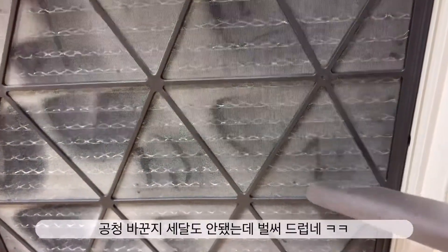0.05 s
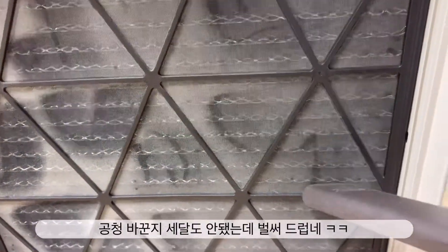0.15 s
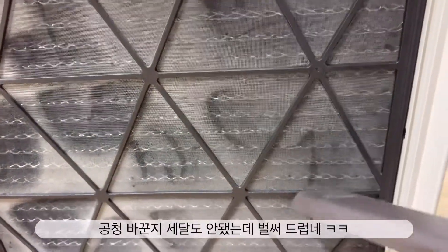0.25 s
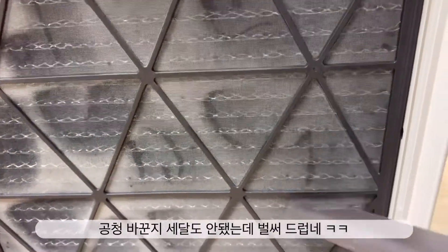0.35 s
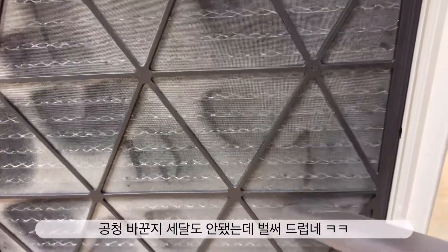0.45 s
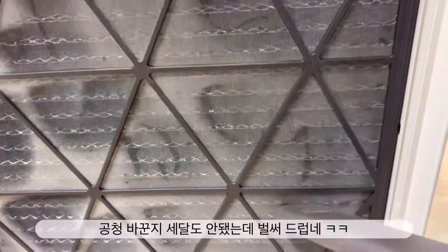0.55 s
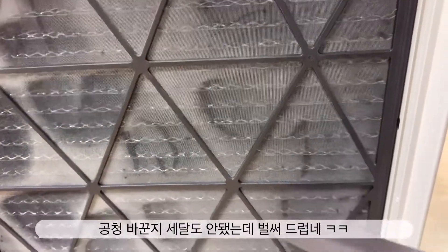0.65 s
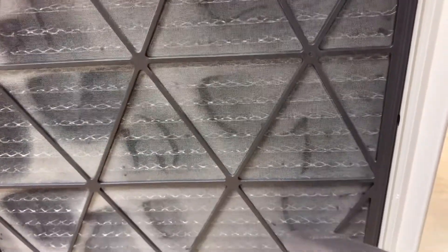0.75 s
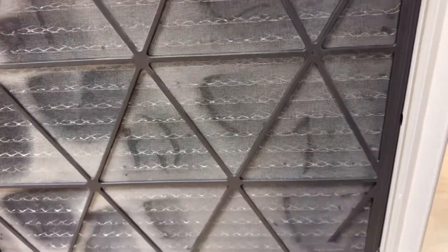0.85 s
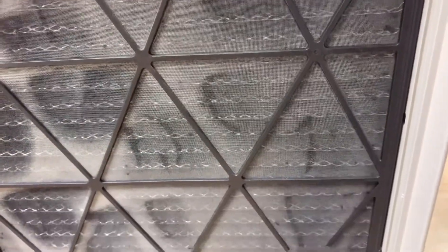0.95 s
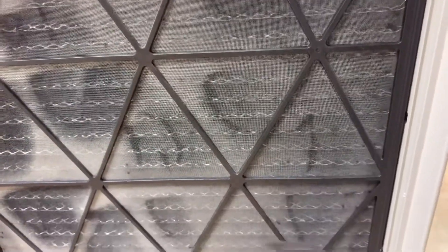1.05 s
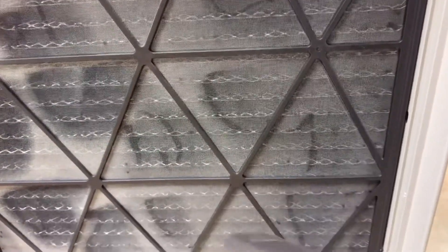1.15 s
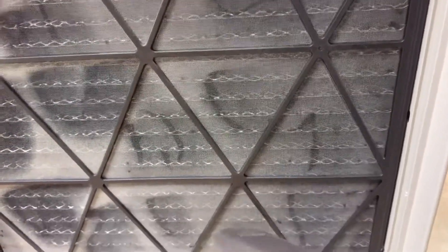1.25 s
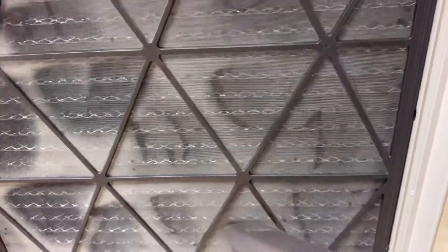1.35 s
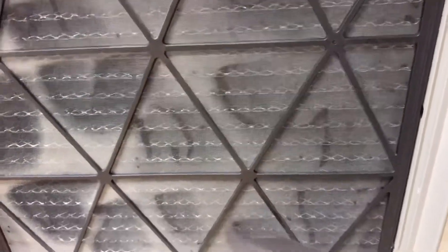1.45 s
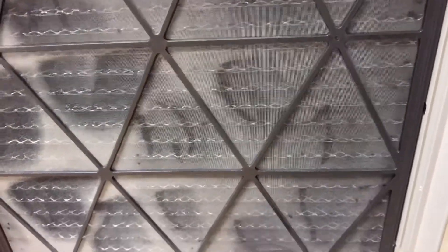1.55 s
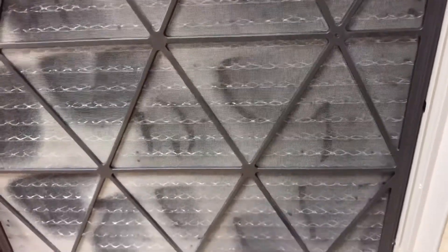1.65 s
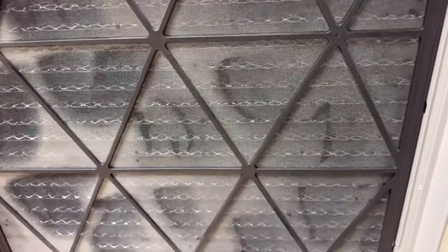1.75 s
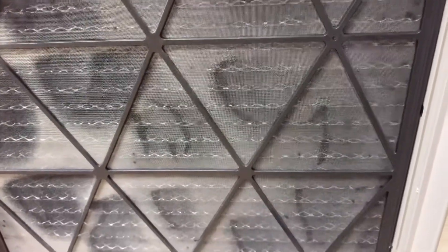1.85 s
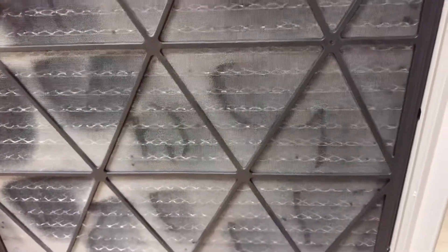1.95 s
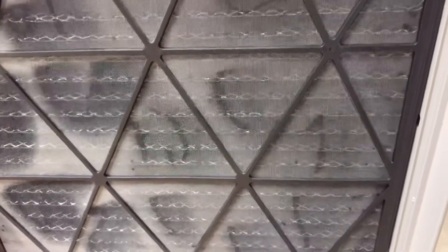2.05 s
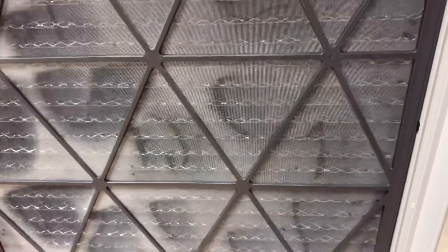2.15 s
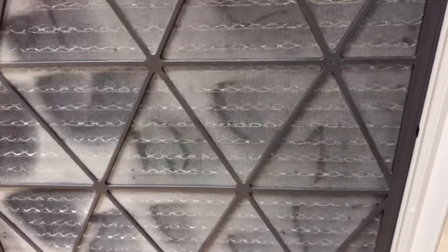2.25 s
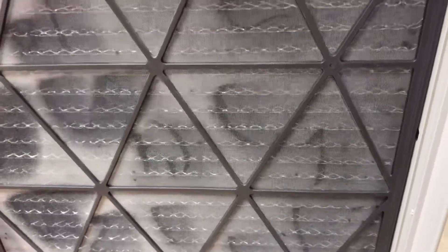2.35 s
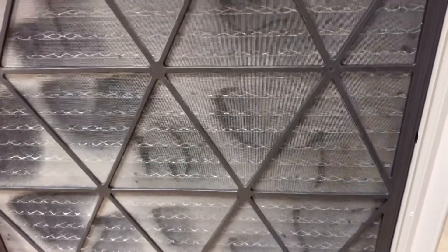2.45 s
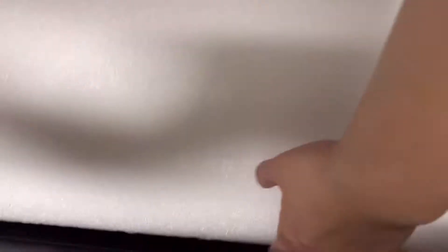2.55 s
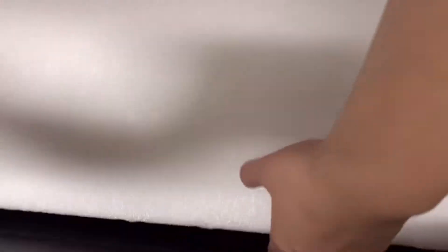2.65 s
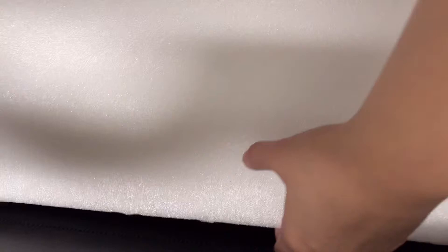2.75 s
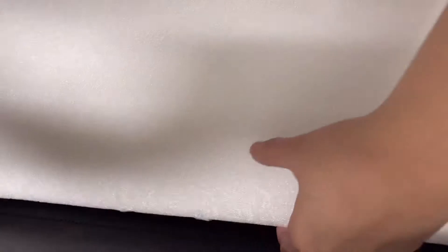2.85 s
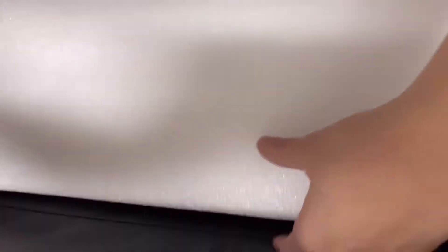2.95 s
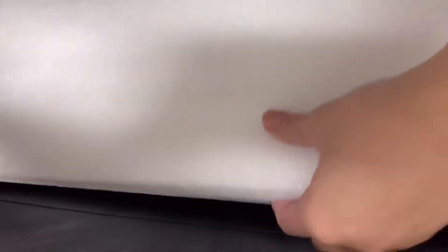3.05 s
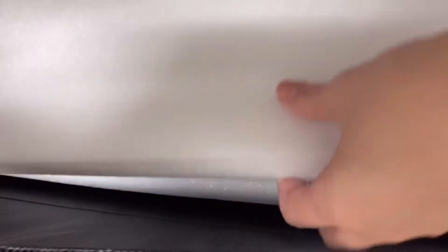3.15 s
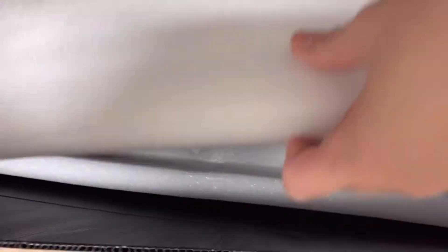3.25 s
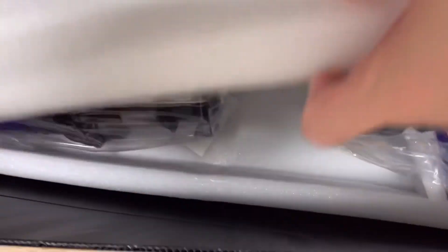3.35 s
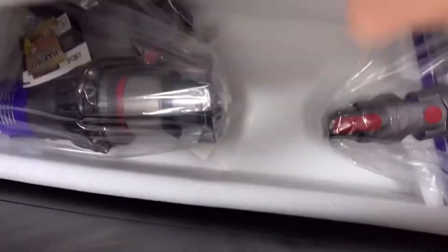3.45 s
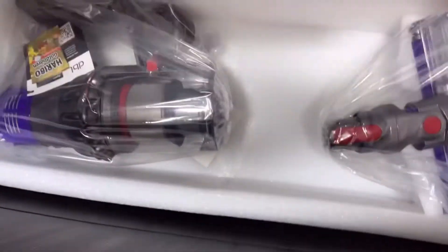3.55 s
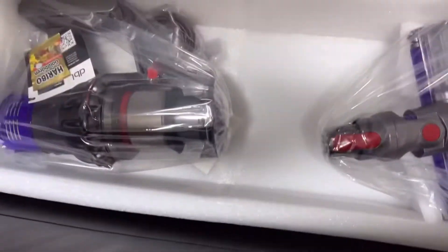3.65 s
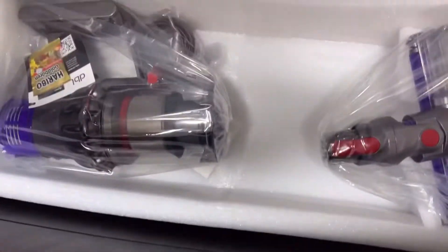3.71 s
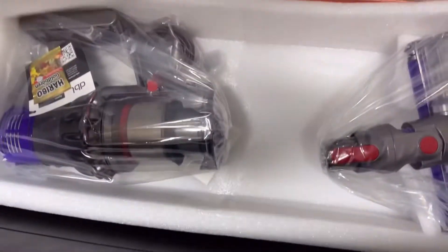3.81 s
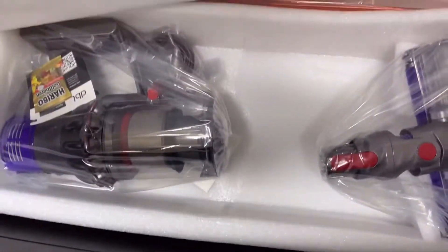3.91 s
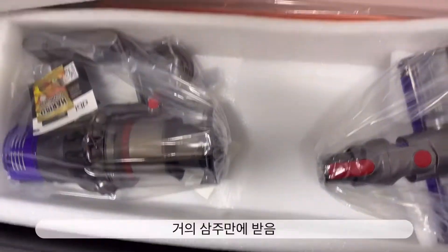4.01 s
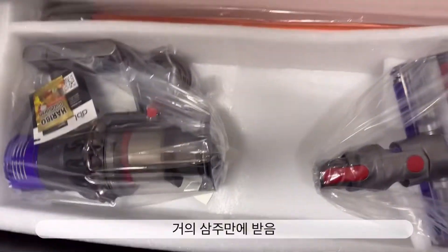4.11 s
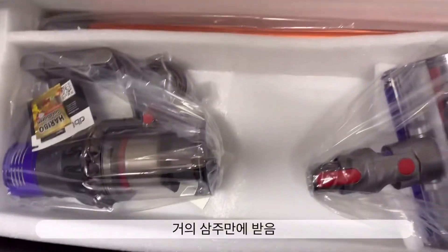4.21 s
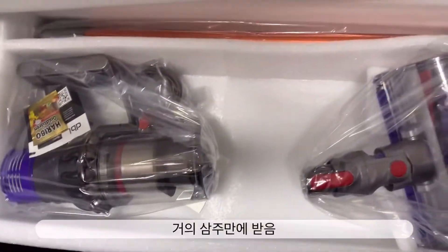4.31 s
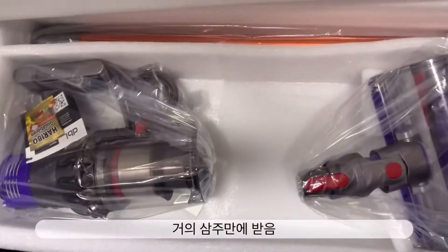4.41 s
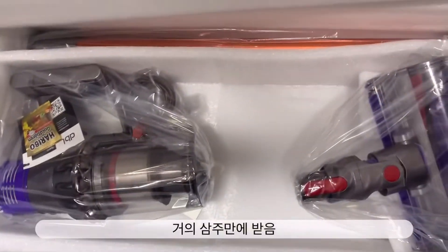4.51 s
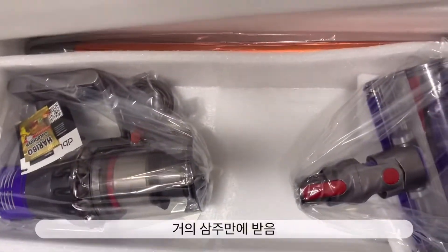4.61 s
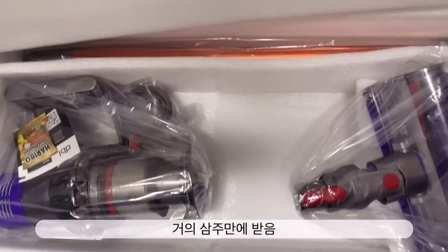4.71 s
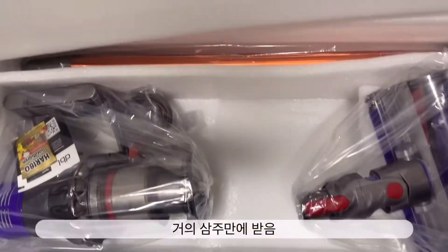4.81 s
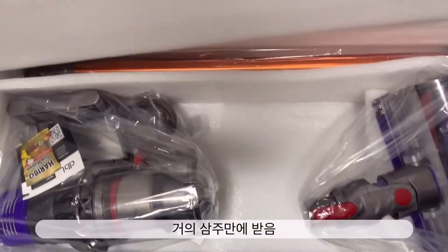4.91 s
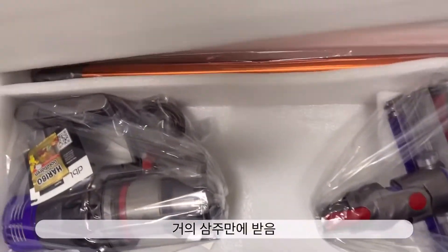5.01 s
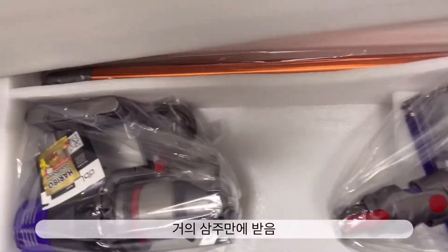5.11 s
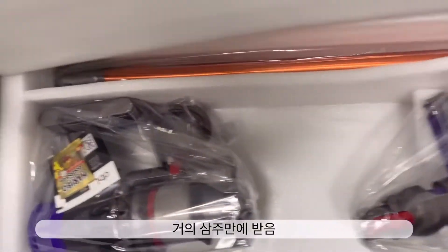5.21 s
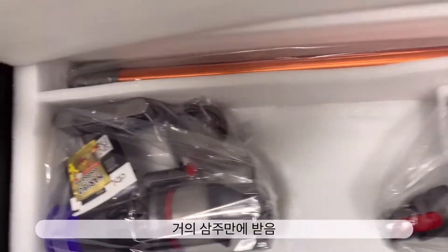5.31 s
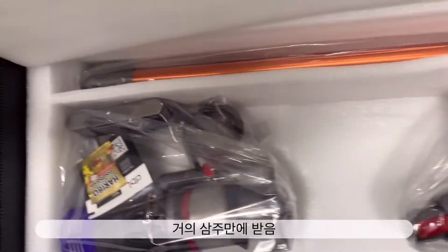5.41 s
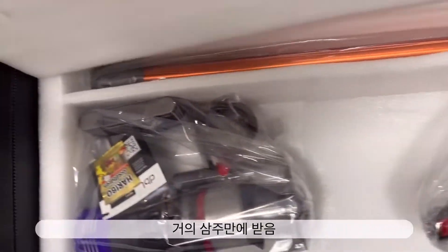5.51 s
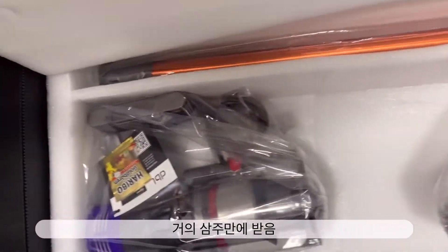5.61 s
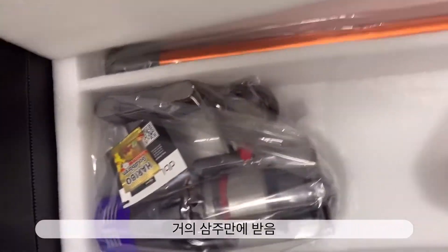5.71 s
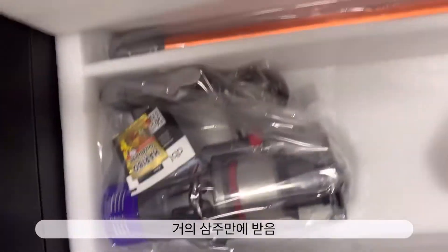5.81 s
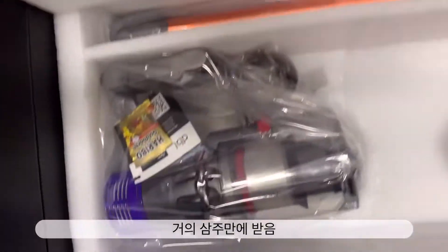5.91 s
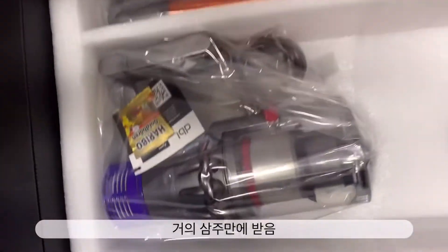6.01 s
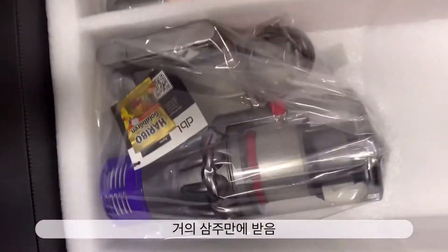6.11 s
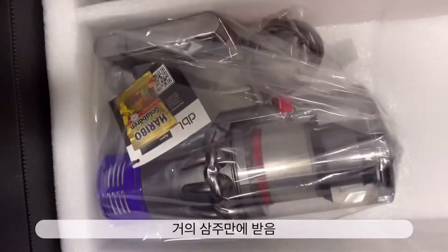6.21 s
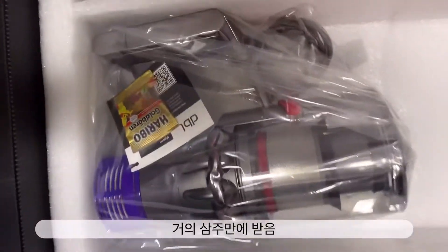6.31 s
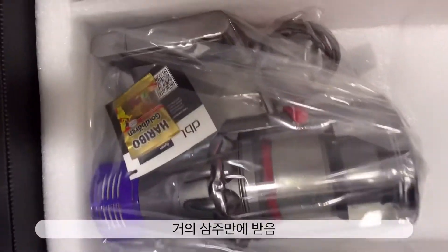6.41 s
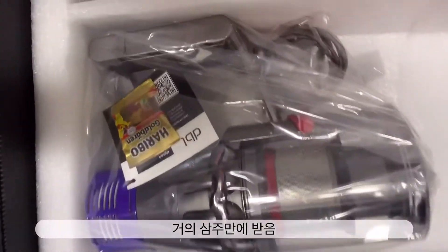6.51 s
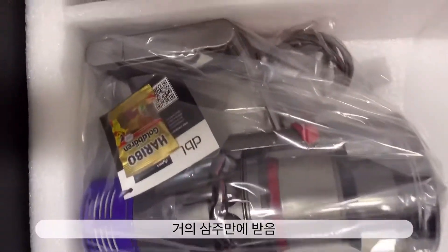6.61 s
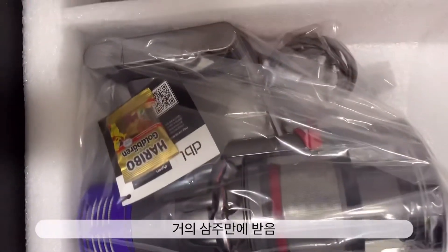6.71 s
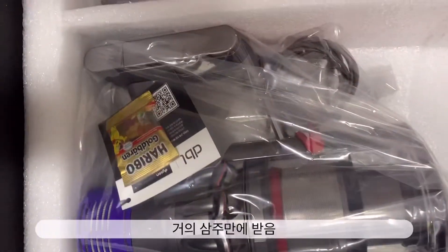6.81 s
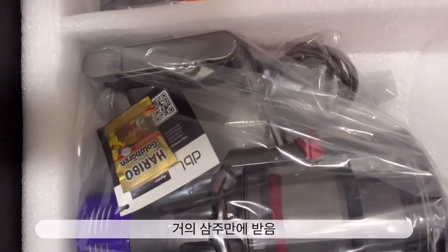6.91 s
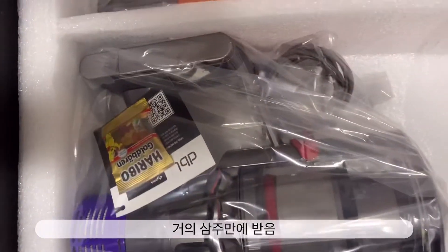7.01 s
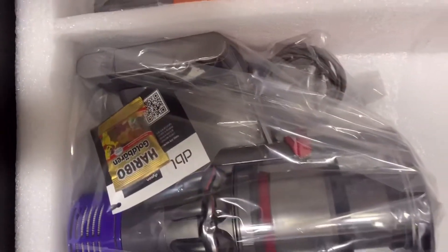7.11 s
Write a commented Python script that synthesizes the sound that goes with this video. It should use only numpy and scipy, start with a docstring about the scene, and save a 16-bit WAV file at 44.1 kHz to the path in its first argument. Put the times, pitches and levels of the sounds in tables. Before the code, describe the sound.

A cordless vacuum whines and rushes over a filter mesh, winds down and cuts off, then foam and plastic wrap rub and bump in a quiet room.

```python
"""A cordless vacuum cleaner first sucks at a filter mesh: turbulent air, coloured by the wand's standing
waves, under a whine of sine lines locked to the shaft. The motor then coasts down and the sound breaks off.
Next, close by in a quiet room, a foam sheet is dragged off a packing case and hands rub over foam and
plastic wrap: friction noise in three bands follows each stroke. The padded case answers bumps with dull
two-mode thuds, and caught edges snap and ring, over low room noise and a faint hum."""
import sys
import numpy as np
from scipy import signal
from scipy.fft import rfft, irfft
from scipy.io import wavfile
from scipy.ndimage import uniform_filter1d

SR = 44100
rng = np.random.default_rng(int(sys.argv[2]) if len(sys.argv) > 2 else 0)


def store_pcm(level_fs):
    """Save levels as 16-bit WAV."""
    pcm = np.round(np.clip(level_fs, -1, 1) * 32767).astype(np.int16)
    wavfile.write(sys.argv[1], SR, np.atleast_2d(pcm).T)


N = 315756
TIME = np.arange(N) / SR  # seconds
BINS = np.fft.rfftfreq(N, 1 / SR)  # Hz

# Motor lines. Each row: multiple of the shaft speed, base rms level in dB, left-right difference in dB.
MOTOR_LINES = [(1, -48, -1), (2, -62.5, 4), (3, -86, 20), (5, -88, -7), (6, -65, -1), (8, -60, -9),
               (9, -44, 2)]
# Suction in time. Each row: time in seconds, level of the rushing air in dB,
# level of the shaft line in dB (used relative to its mean).
SUCTION_CURVE = [(0.0, -46.5, -60.5), (0.2, -45.5, -53), (0.46, -46.5, -48), (0.93, -45.5, -48),
                 (1.46, -47, -47.5), (2.02, -48, -51), (2.06, -49, -54)]
# Air through nozzle and exhaust. Each row: frequency in Hz, relative density in dB per Hz.
AIR_SPECTRUM = [(25, -56), (45, -27), (75, -18.5), (160, -17), (250, -18), (520, -10.5), (700, -15),
                (900, -16.5), (1500, -16.5), (2300, -17), (3600, -18), (7800, -21.5), (9500, -17.5),
                (12500, -18), (15700, -18.5)]
# Standing waves of the wand. Each row: frequency in Hz, width in Hz, change of level in dB.
WAND_MODES = [(590, 53, 4), (684, 137, -11), (900, 350, 4), (1090, 91, -5), (1282, 54, 7.5),
              (1540, 330, -3.5), (2840, 114, 6), (3760, 270, 2), (5800, 98, -9.5)]
# Stereo image of the air, in three lists. Each row: frequency in Hz, then left-right likeness (clipped to
# 0..1) in the first list, lead of the left in radians in the second, left-right difference in dB in the third.
AIR_IMAGE = ([(60, 1.9), (200, 2.16), (500, 1.35), (1400, 0.66), (3000, 0.63), (6000, 0.24), (8000, -0.9),
             (12000, 0.9)], [(20, 0.5), (300, -.5), (860, -1.5), (1120, -2.5), (1460, -2), (1810, -4.5),
             (2070, -5), (3100, -8.5), (3880, -10.5), (5860, -15.5), (6890, -16), (8100, -19), (10400, -11),
             (16300, -12.5)], [(60, -2), (110, -1), (200, -0.5), (380, 0), (700, -4), (1290, -2.5),
             (2380, 0.5), (4400, 0), (8120, 0), (15000, -.5)])
# Rubbing strokes. Each row: start in seconds, length until the hand lets up in seconds, rise in seconds,
# fall in seconds, hiss at the stroke's end in dB, swell along the stroke in dB, scrape against the hiss in dB,
# groan against the hiss in dB (before a common cut), left-right difference in dB.
RUB_STROKES = [ (2.273, 0.056, 0.02, 0.026, -67.5, -0.5, 0, 8.5, -0.5),
               (2.34, 0.15, 0.01, .04, -63, 2, -19, -24, -2),
               (2.505, 0.2, 0.046, 0.11, -39.5, 9.5, -15.5, -14.5, -0.5),
               (2.713, .42, 0.066, 0.042, -34, 4, -13.5, -18, -0.5),
               (2.922, 0.4, 0.13, 0.11, -41.5, -2.5, 3.5, -1, 0.5),
               (3.385, 0.036, 0.017, 0.076, -38.5, -8, -2.5, -7.5, -0.5),
               (3.455, 0.041, 0.034, 0.069, -43, 0, -1, -6, 0),
               (3.559, 0.24, 0.045, 0.084, -42.5, 5.5, -9, -12.5, 0.5),
               (3.849, 0.069, 0.1, 0.14, -62, -1, 6.5, 9.5, -1.5),
               (4.186, 0.1, 0.0097, .05, -47.5, 8, -8.5, -6, -1.5),
               (4.255, 0.18, 0.041, 0.084, -48.5, -2.5, -6, -1, 0),
               (4.62, 0.35, 0.02, 0.066, -62, 5, -5.5, -3.5, -1.5),
               (4.75, 0.047, .025, 0.018, -57, 5, -31, -17, -3),
               (4.94, 0.062, 0.038, 0.12, -48, 2.5, -10, -11.5, 0),
               (5.04, 0.14, 0.072, 0.069, -62, -12, -2, 0.5, -0.5),
               (5.265, 0.025, 0.022, 0.071, -67, -13, -6, -5, -3),
               (5.335, 0.41, 0.023, 0.15, -67.5, -3.5, -1.5, -6, -1.5),
               (5.5, 0.064, 0.037, 0.065, -59.5, -4, -12, -5, -2.5),
               (5.924, 0.16, .12, 0.073, -48, 2.5, -5, 1.5, -1.5),
               (6.32, 0.2, 0.02, 0.073, -37.5, 10, -7.5, -8, -0.5),
               (6.728, 0.11, 0.049, 0.044, -49.5, 5.5, -1.5, -12, -2),
               (6.87, 0.097, 0.054, .04, -68, 2.5, 13, 5.5, 0),
               (6.955, 0.073, 0.055, 0.11, -42.5, 5.5, -4, -10, -1),
               (7.07, 0.079, 0.067, .05, -46, 2.5, -1.5, -5, 0), ]
# Spectra of the three parts of the rubbing. Each row: frequency in Hz, relative density in dB per Hz.
HISS_SPECTRUM = [(1500, -25), (3200, -7), (4300, -1.5), (5500, -4), (7800, -2), (10500, -0.5),
                 (13000, -0.5), (15700, -5.5)]
SCRAPE_SPECTRUM = [(400, -33), (750, -8.5), (1010, -1.5), (1220, -7), (1520, -2.5), (1800, -4), (2300, 0),
                   (3000, -1), (3800, -7.5), (6000, -13), (12000, -36)]
GROAN_SPECTRUM = [(20, -25), (50, 9), (100, 7), (135, 6), (195, 5.5), (270, 1), (335, -3), (465, 0.5),
                  (620, -8.5), (900, -7), (2000, -16.5)]
# Stereo image of the rubbing and the room, in three lists. Each row: frequency in Hz, then left-right likeness
# in the first list, lead of the left in radians in the second, left-right difference in dB in the third.
RUB_IMAGE = ([(60, 0.9), (250, 0.96), (500, 0.22), (2000, 0.21), (6500, 0.11), (10000, 0.24)], [(20, -1.5),
             (500, 0.32), (16000, .5)], [(60, 2), (110, -4), (200, 2.5), (380, 1), (700, -2.5), (1290, 1),
             (2380, 1.5), (4400, 2.5), (8120, 0.7), (15000, -3)])
# Holds of the hands. Each row: start in seconds, treble tilt in dB per octave, hollow resonance in Hz,
# its level in dB, cancelled band in Hz, its level in dB, case resonance in dB.
HAND_HOLDS = [(2.28, 1, 8600, 0, 5800, -5, 0), (2.76, 4, 7960, 1.5, 5600, -1.5, 8),
              (3.2, -0.3, 3210, -0.5, 5260, -6, 5.5), (3.56, -1, 9300, 2, 2720, -1.5, 5),
              (4.15, -1.5, 1050, 2, 2830, -4, 7), (4.56, -0.5, 10500, 0.5, 2700, 0.5, 7),
              (5.9, -2, 1650, -2, 3120, -4.5, -1.5)]
# Bumps on the case. Each row: time in seconds, lower-mode level in dB, settled pitch in Hz, swell in seconds,
# t60 of the lower mode in seconds, upper mode against the lower in dB.
CASE_BUMPS = [(2.297, -43, 106, 0.0065, 0.075, -22), (2.333, -42.5, 57, 0.0035, 0.23, -22),
              (2.509, -42.5, 108, 0.018, 0.089, -13), (2.704, -34.5, 53.6, 0.014, 0.11, -19),
              (3.0, -39.5, 89.3, 0.021, 0.47, 9), (3.102, -26, 56.3, 0.013, 0.16, -22),
              (3.122, -29, 121.4, 0.0091, 0.31, -11), (3.281, -35, 62.6, 0.0073, 0.52, -5.5),
              (3.415, -35.5, 56.5, .007, 0.48, -11), (3.495, -36.5, 62, 0.0094, 0.27, -5.5),
              (3.617, -26.5, 105.2, 0.014, 0.34, -9), (3.691, -38.5, 124, 0.025, 0.42, -10),
              (3.755, -36, 70, 0.011, 0.24, -5.5), (4.202, -28.5, 58.6, 0.0079, 0.072, -15),
              (4.786, -47.5, 57.6, 0.012, 0.61, -9), (5.008, -38.5, 54.5, .008, 0.29, -5),
              (5.117, -36, 82, 0.0052, 0.094, -12), (5.742, -40, 66.6, .007, 0.1, -22),
              (6.11, -26, 60, 0.0029, .21, -2), (6.344, -34.5, 52, 0.017, 0.41, -18),
              (6.507, -29, 138, 0.0021, 0.087, -12), (6.523, -25, 71.5, 0.012, .17, -9.5),
              (6.844, -43, 72, 0.0078, 0.081, -11)]
# Snags and taps of the wrapping. Each row: time in seconds, level in dB (before a common cut), ring in Hz,
# ring against the snap in dB, t60 of the envelope in seconds.
WRAP_SNAGS = [(2.426, -48, 1080, -2, 0.063), (2.517, -44, 900, 0, 0.046), (3.046, -35, 2250, 9, 0.043),
              (3.142, -28, 2280, 9, 0.052), (3.388, -24, 2700, -14, .05), (3.402, -28, 2800, 3, 0.048),
              (3.421, -29, 2610, 7.5, 0.06), (4.082, -37.5, 5070, -17, 0.015),
              (4.198, -38.5, 11600, 10, 0.019), (4.303, -33, 2220, 3.5, 0.063),
              (4.448, -46, 503, 19.5, 0.057), (4.884, -60.5, 497, 21.5, 0.13),
              (5.099, -43.5, 616, 10.5, 0.074), (6.341, -24.5, 10800, -0.5, 0.027),
              (6.519, -35, 2400, 10, 0.13)]
# Room noise. Each row: frequency in Hz, relative density in dB per Hz.
ROOM_SPECTRUM = [(25, -5), (60, 3), (130, -4.5), (228, -8), (283, -13.5), (351, -9), (767, -20.5),
                 (1500, -22.5), (2400, -30.5), (5000, -44), (15700, -42)]
# A distant appliance. Each row: frequency in Hz, mean rms level in dB.
HUM_LINES = [(242, -68.5), (360.7, -70.5)]

SHAFT_HZ, RELEASE_S, BREAK_S = 1899.0, 2.066, 2.271  # full speed, trigger let go, sound breaks off
SHAFT_DROP, SHAFT_REMNANT = 22, 0.34  # power of speed by which the shaft line dies, share that coasts on
BLADE_REMNANT_DB = -38
RISE_DB, RISE_POWER, FALL_POWER = 22, 1.59, 1.19  # RISE_DB down at its start, 20 dB down after its fall time
LEAD_S = .15  # span of the rise kept ahead of each stroke
CASE_HZ = 497  # the air in the case
CASE_LINGER = 1.35  # scrape and groan take this much longer to fall than the hiss
CROSS_S = 4.56  # the hands move from just left of the microphone to its right
LAG_BEFORE_MS, LAG_AFTER_MS = -0.12, 0.457  # lag of the left port
UPPER_RATIO, UPPER_LIFE = 2.25, 0.63  # the upper mode's pitch and ring time against the lower one's
ROOM_DB = -58.5
EDGE_HZ = 15800  # upper band limit


def vacuum():
    """Superposition: broadband flow noise and tonal lines both sink with the impeller speed."""
    speed = motor_speed()
    out = rushing_air(speed) + whistle() + motor_whine(speed)
    return out * np.clip((BREAK_S - TIME) / .004, 0, 1)


def motor_speed(drag_s=.162, stop_s=.75):
    """Braked rotation: once the trigger is let go, air drag and bearing friction slow the impeller."""
    coast = np.maximum(TIME - RELEASE_S, 0)
    return np.maximum(1 - coast / stop_s, 0) / (1 + coast / drag_s)


def rushing_air(speed):
    """Turbulence in a pipe: standing waves colour flow noise whose level follows powers of the speed."""
    air_db, _ = curves(SUCTION_CURVE)
    pipe_db = sum(db * np.exp(-2 * ((BINS - hz) / width) ** 2) for hz, width, db in WAND_MODES)
    colour_db = read(AIR_SPECTRUM) + pipe_db + 2 * ripple(22)
    air = noise(colour_db, AIR_IMAGE, (2200, 15000)) * amp(air_db + 0.68 * wander(25))
    # the low roar wavers as the nozzle moves over the mesh
    roar = signal.sosfiltfilt(signal.butter(2, 1000, fs=SR, output="sos"), air)
    flow = np.minimum(1.1 * speed, 1)
    wavering_roar = roar * amp(0.5 * wander(8.8))
    return (air - roar) * flow ** 1.57 + wavering_roar * flow ** 2.0


def whistle():
    """Resonant filtering of noise: a breathy whistle grows just before the stop and lingers in the coasting."""
    peak = signal.iirpeak(5550, 12, fs=SR)
    breath = unit(signal.lfilter(*peak, rng.standard_normal((2, N))))
    return amp(-58) * breath * np.interp(TIME, [1.8, 2.1, 2.27], [0, 1, .5])


def motor_whine(speed):
    """Rotating machinery: imbalance and blades radiate sine lines at multiples of the shaft speed."""
    _, shaft_db = curves(SUCTION_CURVE)
    turns = np.cumsum(SHAFT_HZ * speed * (1 + 0.00094 * wander(15))) / SR
    lag_turns = 0.00043 * SHAFT_HZ * speed  # the motor is nearer to the right port
    sweep_db = 4 * wander(45) * np.minimum(4 * (1 - speed), 1)  # gliding lines cross the room's peaks and dips
    out = np.zeros((2, N))
    for order, db, side_db in MOTOR_LINES:
        if order == 1:  # the unbalance line dies quickly when the drive stops
            coasting = (1 - SHAFT_REMNANT) * speed ** SHAFT_DROP + SHAFT_REMNANT * speed
            level = amp(db + shaft_db - shaft_db.mean()) * coasting
        else:  # the blade lines flutter in the flow and keep a faint remnant at low speed
            level = amp(db + 2 * wander(20)) * (speed ** 4 + amp(BLADE_REMNANT_DB))
        lag = lag_turns * order * (order < 4)  # only the low orders lag
        line = np.sin(2 * np.pi * np.array([order * turns - lag, order * turns]))
        out += np.sqrt(2) * level * amp(sweep_db) * line * amp([[side_db / 2], [-side_db / 2]])
    return out


def rubbing():
    """Stick-slip friction: foam slides in countless tiny slips; pressing harder scrapes and makes the case groan."""
    sliding, pressing, groaning = stroke_levels()
    treble, middle, bass = (4500, 15500), (900, 3500), (280, 750)  # Hz
    judder = wander(50)  # stick and slip shakes all parts together
    hiss = noise(read(HISS_SPECTRUM) + 2.2 * ripple(35), RUB_IMAGE, treble, grit=0.16)
    hiss = hiss * sliding * amp(0.34 * judder)
    scrape = noise(read(SCRAPE_SPECTRUM) + 3.34 * ripple(35), RUB_IMAGE, middle, grit=0.17)
    scrape = scrape * pressing * amp(0.7 * judder)
    groan = noise(read(GROAN_SPECTRUM) + 4.7 * ripple(25), RUB_IMAGE, bass)
    groan = groan * groaning * amp(-3.5 + 1.75 * judder)
    return gripped(hiss + scrape + groan)


def stroke_levels():
    """Addition of powers: each stroke eases in, changes level as the hand slides, and falls; overlaps add."""
    power = np.zeros((3, 2, N))  # hiss, scrape and groan at both ports
    t = np.arange(SR) / SR - LEAD_S
    for s, length, rise, fall, db, swell_db, scrape_db, groan_db, pan_db in RUB_STROKES:
        before = np.maximum(1 - t / rise, 0)
        after = np.maximum(t - length, 0) / fall
        slide_db = swell_db * (np.minimum(t / length, 1) - 1)
        push = amp(db - RISE_DB * before ** RISE_POWER + slide_db)
        push = push * amp([[pan_db / 2], [-pan_db / 2]])
        for part, part_db, linger in zip(power, (0, scrape_db, groan_db), (1, CASE_LINGER, CASE_LINGER)):
            fall_db = 20 * (after / linger) ** FALL_POWER
            add(part, s - LEAD_S, (push * amp(part_db - fall_db)) ** 2)
    return np.sqrt(power)


def gripped(x, patchy_db=2.76, resonance_octaves=0.21, cancel_octaves=0.18):
    """Time-varying filtering: the present hold colours the rubbing; the moving contact adds drifting patches."""
    hz, t, z = signal.stft(x, SR, nperseg=512, noverlap=384)
    rows = np.array(HAND_HOLDS)
    held = rows[np.maximum(np.searchsorted(rows[:, 0], t) - 1, 0)]
    tilt, peak_hz, peak_db, dip_hz, dip_db, case_db = held[:, 1:].T
    hz = hz[:, None] + 1  # keeps the logarithm finite
    db = tilt * np.maximum(np.log2(hz / 9000), -1) * np.clip(hz / 4500, 0, 1)
    bells = ((peak_hz, peak_db, resonance_octaves), (dip_hz, dip_db, cancel_octaves), (CASE_HZ, case_db, .4))
    for centre, height, octaves in bells:
        db += height * np.exp(-(np.log2(hz / centre) / octaves) ** 2)
    patches = uniform_filter1d(rng.standard_normal(db.shape), size=3, axis=0)
    patches = uniform_filter1d(patches, size=22, axis=1)
    z = z * amp(uniform_filter1d(db, size=20, axis=1) + patchy_db * unit(patches))
    lag_ms = np.where(t < CROSS_S, LAG_BEFORE_MS, LAG_AFTER_MS)  # the left port hears early, then late
    z[0] *= np.exp(-2j * np.pi * hz * lag_ms / 1000)
    return signal.istft(z, SR, nperseg=512, noverlap=384)[1][:, :N]


def thuds(settle_s=0.013, tight=.25, rattle_db=-14):
    """Damped oscillation: the padded case swings in two modes; their pitch sags as the contact loosens."""
    out = np.zeros((2, N))
    t = np.arange(SR // 2) / SR
    low = signal.butter(2, 260, fs=SR)
    for s, db, hz, swell, t60, upper_db in CASE_BUMPS:
        turns = np.cumsum(hz * (1 + tight * np.exp(-t / settle_s))) / SR
        decay_db = -60 * np.maximum(t - swell, 0) / t60
        rattle = amp(rattle_db) * unit(signal.lfilter(*low, rng.standard_normal((2, len(t)))))
        lower = amp(decay_db) * (np.sin(2 * np.pi * turns) + rattle)
        upper = amp(upper_db + decay_db / UPPER_LIFE) * np.sin(2 * np.pi * UPPER_RATIO * turns)
        add(out, s, amp(db) * np.minimum(t / swell, 1) * (lower + upper))
    return out * amp([[-1.5], [1.5]])  # stronger on the right


def snags():
    """Impulsive release: a caught edge lets go with a bright snap, exciting a short, broad resonance."""
    out = np.zeros((2, N))
    t = np.arange(SR // 5) / SR
    for s, db, hz, ring_db, t60 in WRAP_SNAGS:
        shared, left, right = rng.standard_normal((3, len(t)))
        snap = unit(shared + 0.69 * np.array([left, right]))
        mode = signal.iirpeak(hz, 2.2, fs=SR)
        ring = unit(signal.lfilter(*mode, signal.lfilter(*mode, snap)))
        envelope = amp(db - 8 - 60 * t / t60) * np.minimum(t / .0004, 1)
        add(out, s, envelope * (snap + amp(ring_db) * ring))
    return out


def room():
    """Stationary background: low room noise with faint sine lines wavering in level and phase."""
    hum = np.zeros(N)
    for hz, db in HUM_LINES:
        phase = 2 * np.pi * hz * TIME + 1.5 * wander(6.8)
        hum += amp(db + 2 * wander(1.8)) * np.sqrt(2) * np.sin(phase)
    return amp(ROOM_DB) * noise(read(ROOM_SPECTRUM), RUB_IMAGE) + hum


def noise(colour_db, ports, band=(0, SR), grit=0):
    """Partial coherence: coloured noise at two ports, mid rms 1 within band; grit makes uneven micro-slips."""
    size = np.exp(grit * wander(1000)) if grit else 1
    a, b = rfft(rng.standard_normal((2, N)) * size)
    same, phase, side_db = (read(p) for p in ports)
    same = np.clip(same, 0, 1)
    right = (same * a + np.sqrt(1 - same ** 2) * b) * np.exp(-1j * phase)
    z = np.array([a * amp(side_db / 2), right * amp(-side_db / 2)]) * amp(colour_db)
    mid = irfft(z.mean(0) * (BINS > band[0]) * (BINS < band[1]), N)
    return irfft(z, N) / mid.std()


def ripple(spacing_hz):
    """Interference: fine chance peaks and dips in dB across the spectrum, as reflections leave them."""
    heights = rng.standard_normal(len(BINS))
    return np.interp(BINS / spacing_hz, np.arange(len(BINS)), heights) * np.minimum(BINS / 700, 1)


def wander(hz):
    """Low-passed chance: slow fluctuation of rms 1, moving up to about hz times a second."""
    step = max(int(SR / hz / 8), 1)  # samples between coarse points
    coarse = TIME[::step]
    smooth = signal.lfilter(*signal.butter(2, 2 * hz * step / SR), rng.standard_normal(N))
    return unit(np.interp(TIME, coarse, smooth[-len(coarse):]))


def amp(db):
    """Logarithmic level: decibels to gain."""
    return 10 ** (np.asarray(db) / 20)


def unit(x):
    """Normalisation: scales to rms 1."""
    return x / np.sqrt(np.mean(x ** 2) + 1e-20)


def read(points):
    """Interpolation of a spectrum table on a log-frequency axis, at every bin."""
    hz, value = np.transpose(points)
    return np.interp(np.log(BINS + 1), np.log(hz + 1), value)


def curves(rows):
    """Interpolation in time: each column of a curve table, at every sample."""
    s, *columns = np.transpose(rows)
    return [np.interp(TIME, s, c) for c in columns]


def add(mix, s, sound):
    """Superposition: mixes a sound in at time s, cut at the end of the mix."""
    part = mix[:, round(s * SR):][:, :sound.shape[-1]]
    part += sound[..., :part.shape[-1]]


def scene():
    """Succession: the vacuum cleaner, then the unpacking in its quiet room."""
    unpacking = np.clip((TIME - BREAK_S) / 0.0063, 0, 1)
    return vacuum() + unpacking * (rubbing() + thuds() + snags() + room())


def record(dry):
    """Mid-side filtering and band limiting: folds the top treble to mono and removes what lies above the edge."""
    mid, side = dry.mean(0), (dry[0] - dry[1]) / 2
    side = irfft(rfft(side) * np.interp(BINS, [7500, 10000, 12000], [1, .35, 0]), N)
    taps = signal.firwin(801, EDGE_HZ, window=("kaiser", 9), fs=SR)
    return signal.oaconvolve(np.array([mid + side, mid - side]), taps[None], "same", axes=1)


dry = scene()
out = record(dry)
store_pcm(out)
```